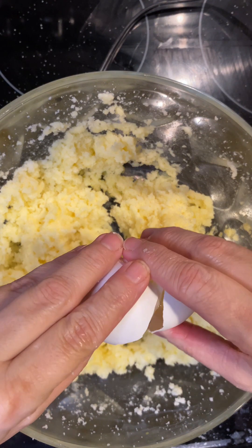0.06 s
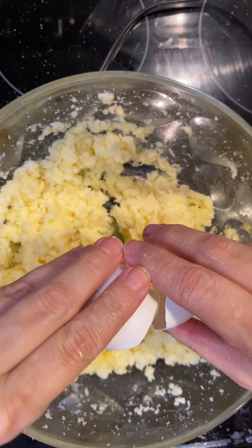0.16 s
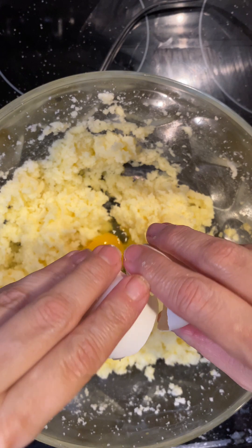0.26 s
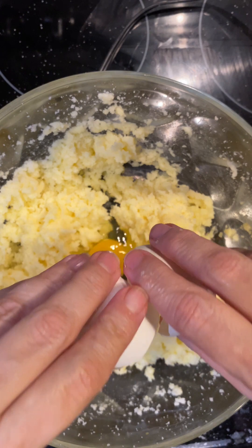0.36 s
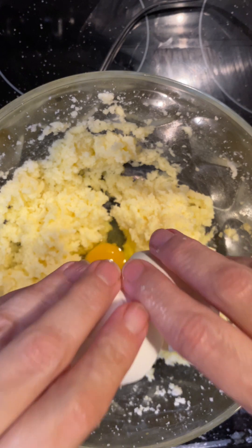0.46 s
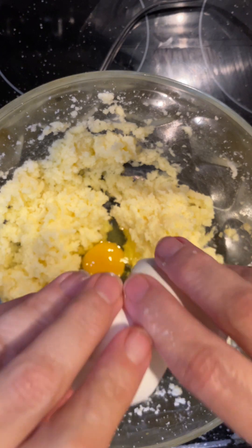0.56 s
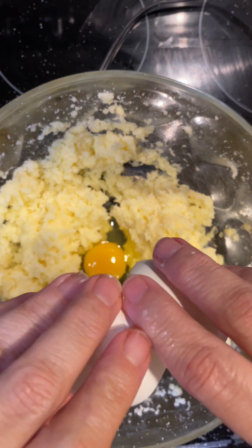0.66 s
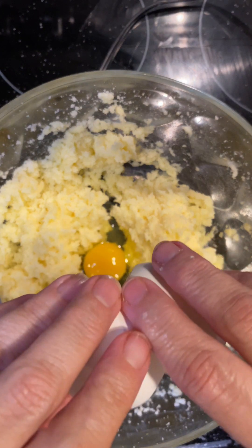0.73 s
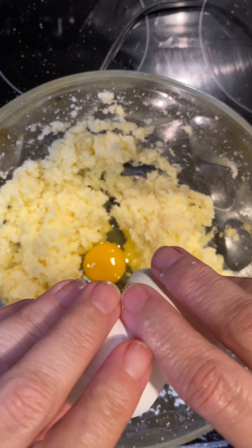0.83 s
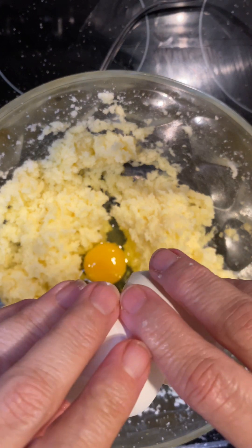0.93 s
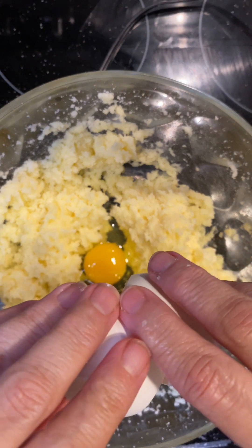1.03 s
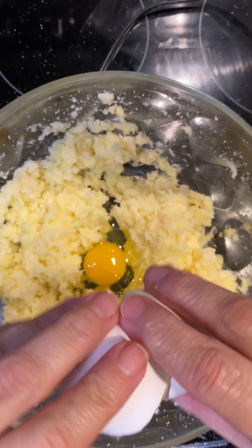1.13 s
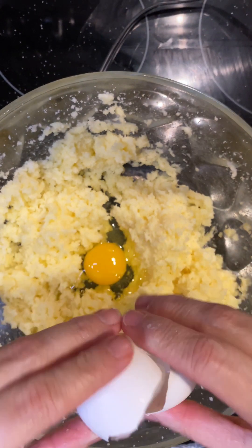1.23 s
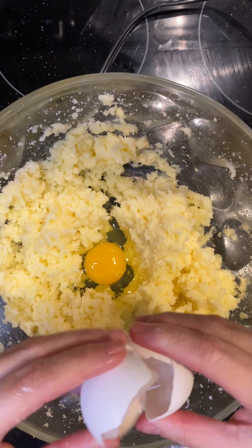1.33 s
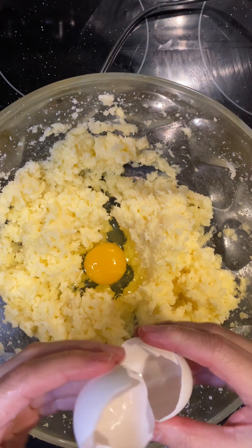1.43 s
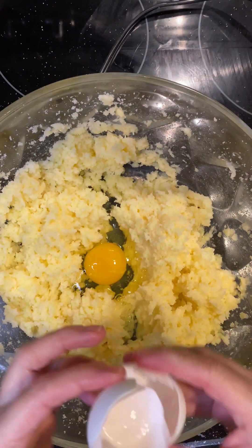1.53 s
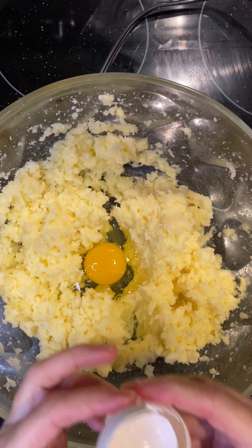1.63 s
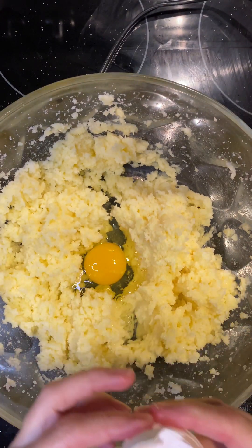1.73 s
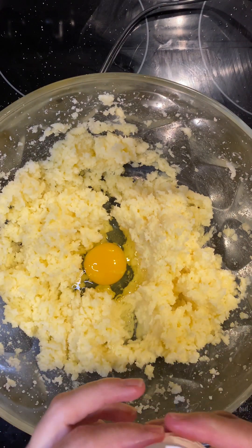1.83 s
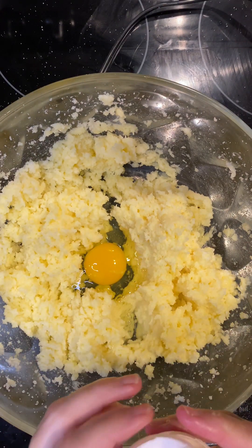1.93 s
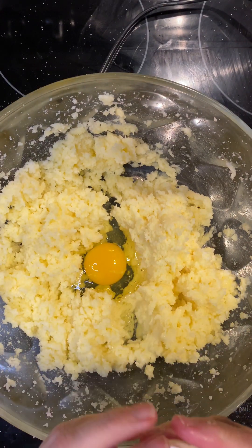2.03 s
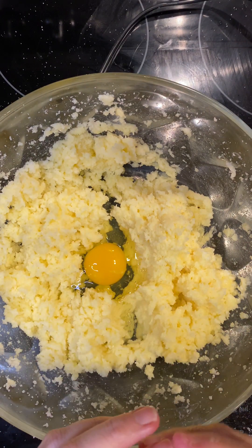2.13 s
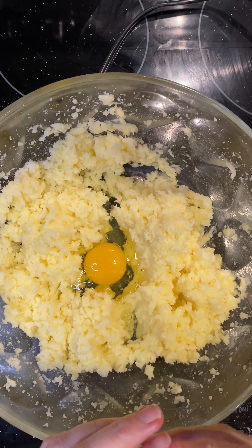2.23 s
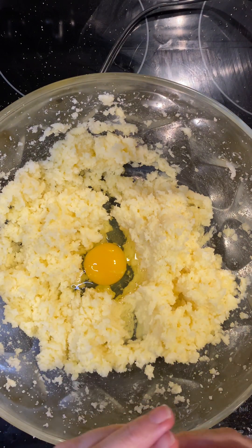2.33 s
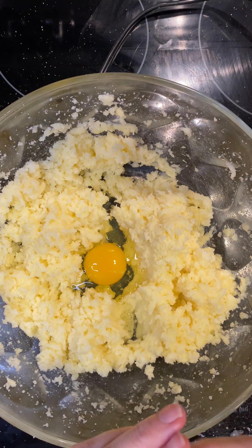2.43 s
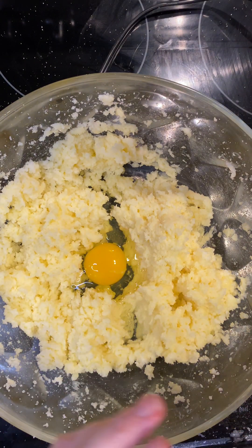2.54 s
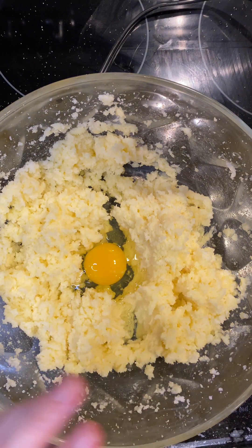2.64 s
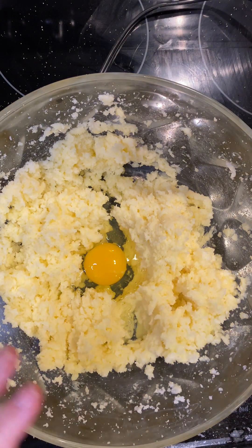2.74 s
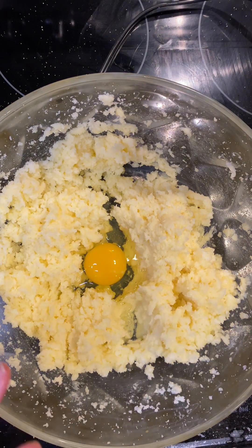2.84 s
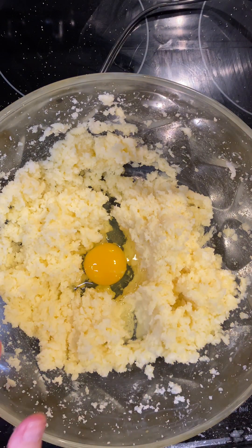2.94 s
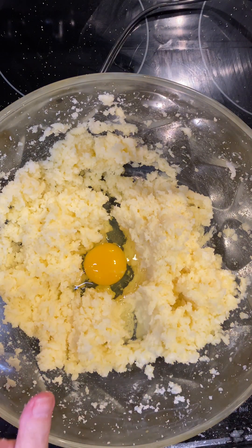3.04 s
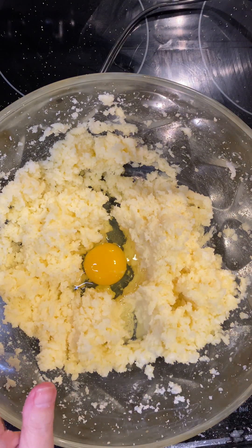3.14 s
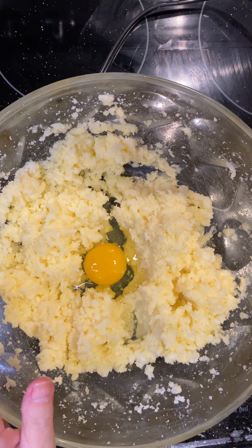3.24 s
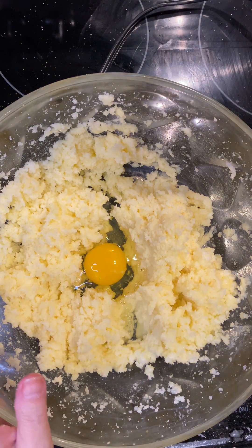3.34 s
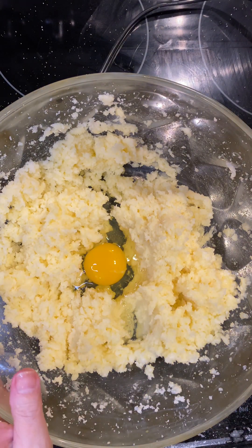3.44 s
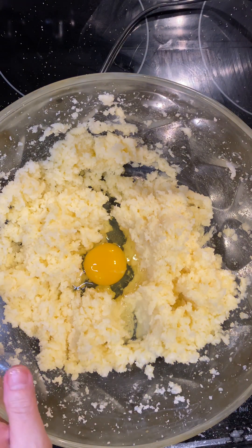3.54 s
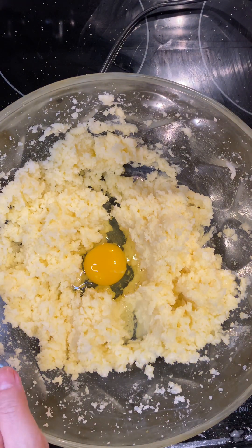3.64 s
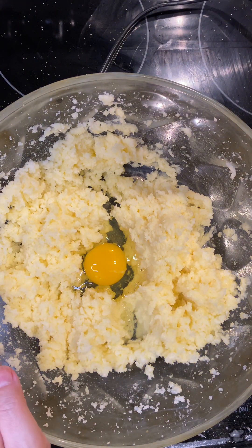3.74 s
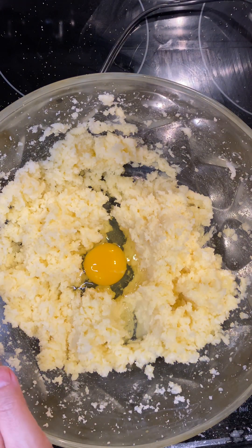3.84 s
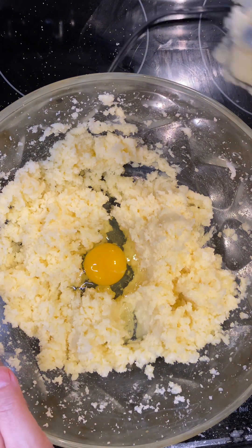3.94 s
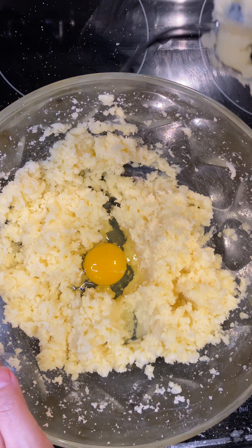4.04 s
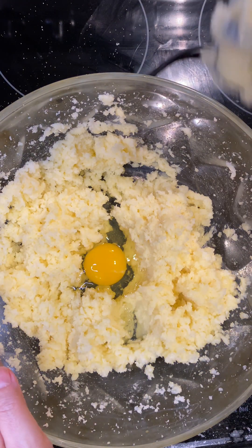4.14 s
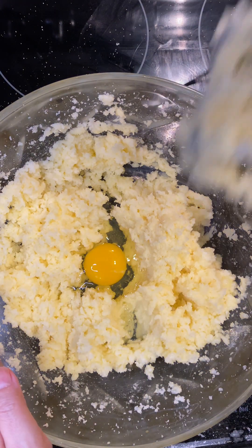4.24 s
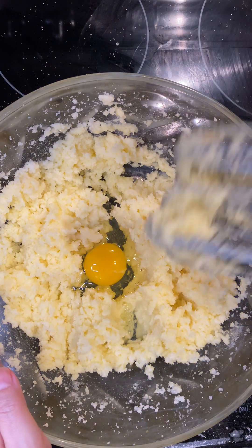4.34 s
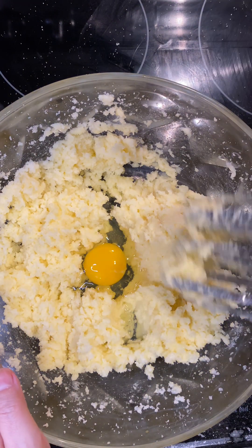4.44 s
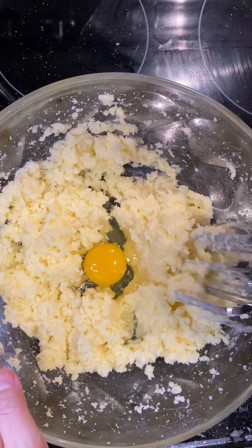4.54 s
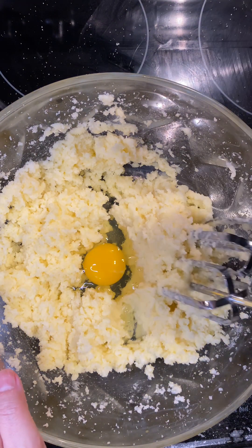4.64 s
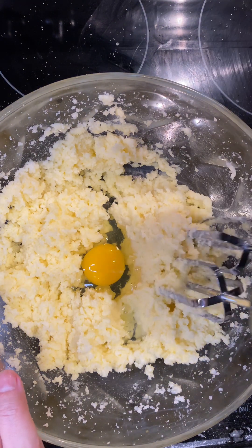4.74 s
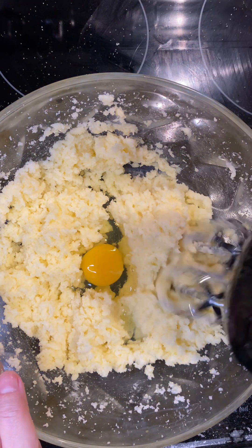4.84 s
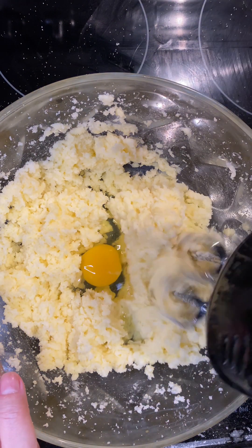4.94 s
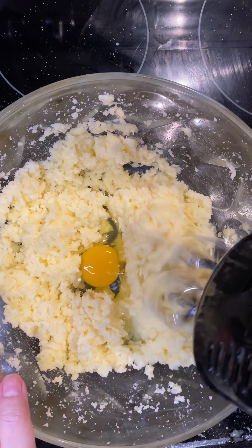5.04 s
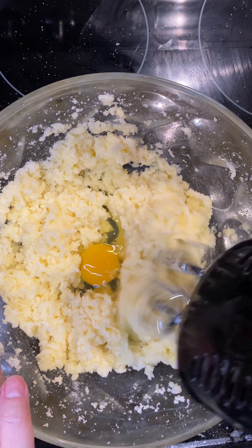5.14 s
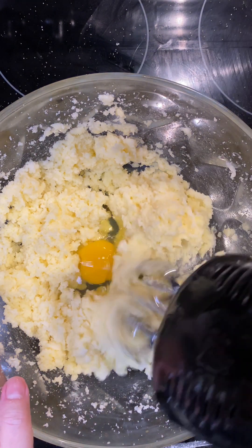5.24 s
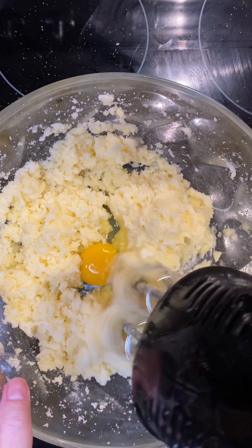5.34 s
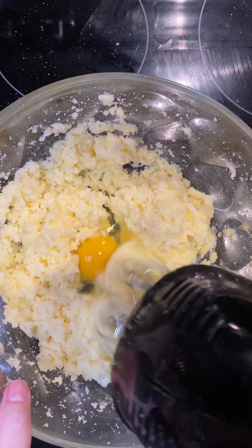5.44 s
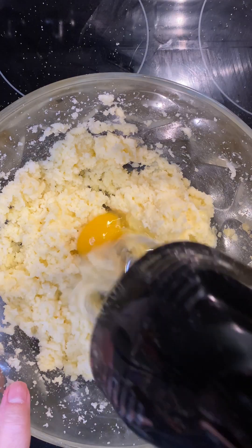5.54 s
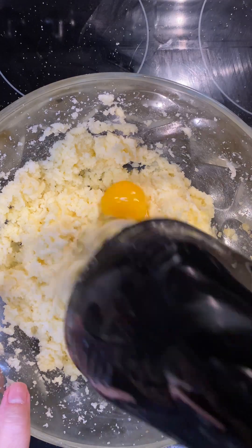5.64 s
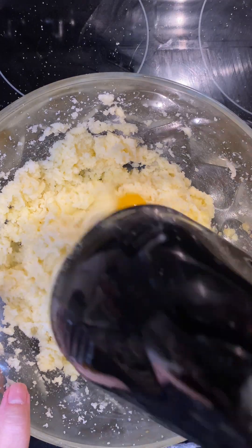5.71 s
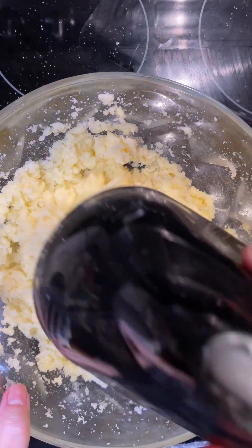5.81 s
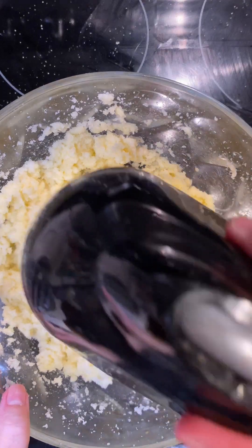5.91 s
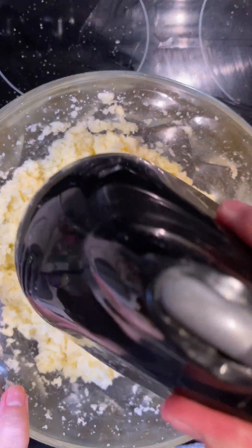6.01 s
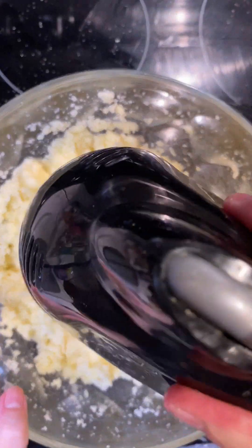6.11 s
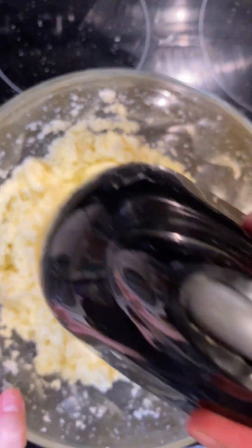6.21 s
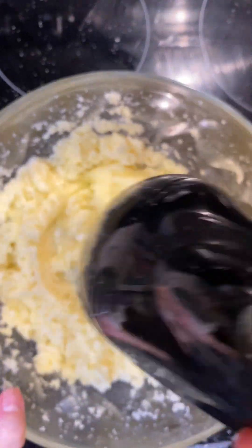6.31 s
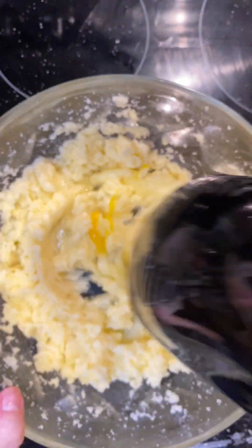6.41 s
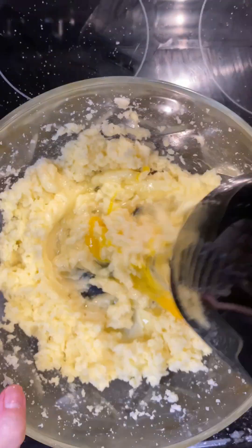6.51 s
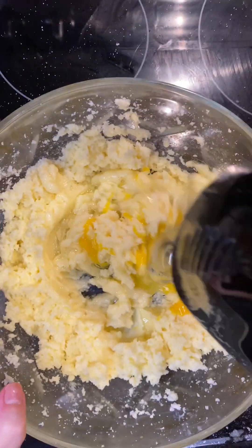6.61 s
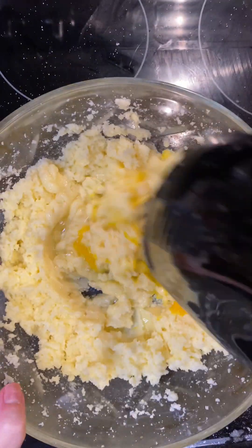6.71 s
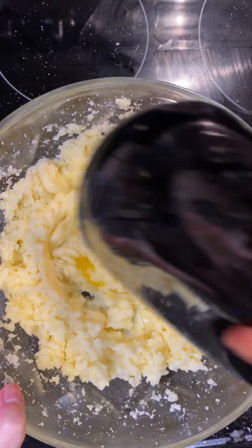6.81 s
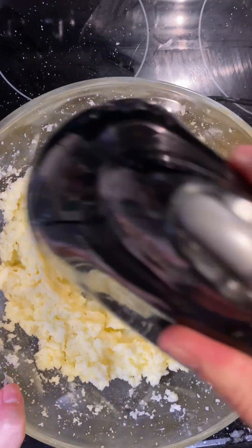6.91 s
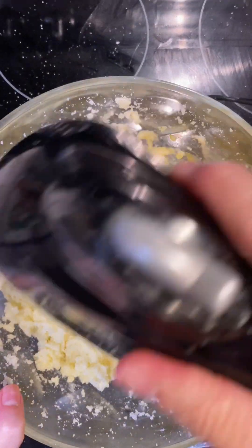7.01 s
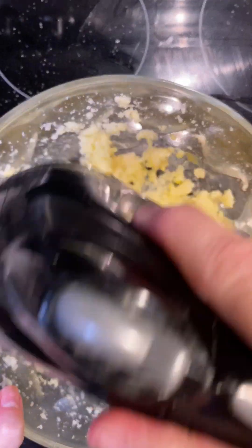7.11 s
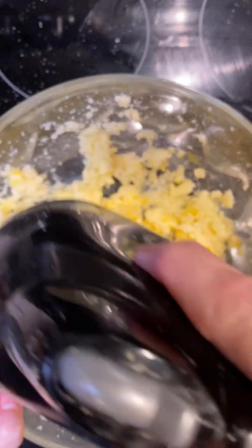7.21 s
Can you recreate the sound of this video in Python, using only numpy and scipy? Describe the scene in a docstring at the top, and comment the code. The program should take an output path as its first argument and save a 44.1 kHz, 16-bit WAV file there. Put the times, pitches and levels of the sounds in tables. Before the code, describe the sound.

Close stereo microphone, nearly dry room. Thin brittle shell clicks come in irregular clusters for over two seconds, with a brief soft plop early on. Near silence follows over faint refrigerator hum, then a bowl knock, handling clicks and a short low scrape. A hand mixer clicks on, pulses roughly while speeding up, and settles into a harsh whirring drone with rushing air, churning batter and dull bowl thumps.

```python
"""A kitchen, close up: fingers pull an eggshell apart, the egg plops into batter, the shell crackles away.
A hand mixer is picked up and switched on; its motor, fed one current pulse per mains cycle, runs up and
whirs; beaters bump the bowl. A fridge hums all along. Clicks and rubbing are shaped noise through rings,
the motor is shaft-locked tones plus gear, air and batter noise, the fridge is wavering sines over noise."""
import sys
import numpy as np
from scipy import signal
from scipy.fft import rfft, irfft, next_fast_len
from scipy.io import wavfile
from scipy.ndimage import uniform_filter1d, map_coordinates

SR = 44100
rng = np.random.default_rng(int(sys.argv[2]) if len(sys.argv) > 2 else 0)


def put_to_file(sound):
    """Save the sound as 16-bit audio at rate SR, in the file named by the first command-line argument."""
    columns = np.atleast_2d(sound).T  # one column per channel
    safe = np.clip(columns, -1, 1)
    whole_steps = np.round(safe * 32767)
    wavfile.write(sys.argv[1], SR, whole_steps.astype(np.int16))


N = 320607
T_S = np.arange(N) / SR


def amp(db):
    """Gain of a level in dB."""
    return 10 ** (np.asarray(db) / 20)


def unit(x):
    """Scaled to rms 1."""
    return x / np.sqrt(np.mean(x ** 2) + 1e-20)


def along(points, hz):
    """Value at hz, interpolated between (hz, value) points on a log axis."""
    f, v = np.transpose(points)
    return np.interp(np.log(hz + 1), np.log(f + 1), v)


def curves(rows):
    """One value per sample for each column after the time."""
    s, *cols = np.transpose(rows)
    return [np.interp(T_S, s, c) for c in cols]


def wobble(knots_per_s):
    """Smooth random curve."""
    knots = rng.standard_normal(int(N * knots_per_s / SR) + 4)
    return map_coordinates(knots, [np.arange(N) * knots_per_s / SR])


def filtered(x, response):
    """x times a complex response of frequency."""
    m = next_fast_len(x.shape[-1] + 8192)
    return irfft(rfft(x, m) * response(np.fft.rfftfreq(m, 1 / SR)), m)[..., :x.shape[-1]]


def mode(f, hz, width_hz):
    """Causal resonance of peak gain 1."""
    return 1j * f * width_hz / (hz * hz - f * f + 1j * f * width_hz)


def modes_sum(f, modes):
    """Complex sum of resonances."""
    return sum(amp(db) * mode(f, hz, width_hz) for hz, width_hz, db in modes)


def modes_power(f, modes, widen=1):
    """Sum of squared resonance magnitudes, no phase."""
    return sum(amp(db) * np.abs(mode(f, hz, widen * width_hz)) ** 2 for hz, width_hz, db in modes)


def noise(gain):
    """Two unrelated noises of one colour, rms 1."""
    return unit(filtered(rng.standard_normal((2, N)), gain))


def coloured(points):
    """Noise pair following (hz, db) points."""
    return noise(lambda f: amp(along(points, f)))


def thuds(rows):
    """Decaying low sines with a soft start; rows: start_s, level_db, pitch_hz, t60_s."""
    out, t = np.zeros(N + 8192), np.arange(8192) / SR
    for s, db, hz, t60 in rows:
        soft_start = 1 - np.exp(-t * hz / 0.22)
        out[round(s * SR):][:len(t)] += amp(db - 60 * t / t60) * np.sin(2 * np.pi * hz * t) * soft_start
    return out[:N]


SNAP = 4.5  # height of the crest sample over the click's noise


def clicks(rows, width_hz, broad_db):
    """Each click is a snap in a brief swell of noise: one ring, a broad snap and a treble part."""
    out, t = np.zeros((2, N + 8192)), np.arange(-1024, 3072) / SR
    crest = lambda x: x / np.sqrt(uniform_filter1d(2 * x[0] ** 2, size=66).max())
    for s, db, hz, treble_db, ms in rows:
        life_s = np.clip(ms - .9, .4, 40) / 1000
        swell_db = np.where(t < 0, 34 * t, -12 * t) / life_s
        burst = rng.standard_normal((2, len(t))) * amp(swell_db)
        burst[0, t == 0] = SNAP
        middle = filtered(burst, lambda f: mode(f, hz, width_hz) + amp(broad_db) * mode(f, 3000, 3900) ** 2)
        treble = filtered(burst, lambda f: mode(f, 6950, 12000) ** 2)
        click = crest(middle) + amp(treble_db) * crest(treble)
        out[:, round(s * SR):][:, :len(t)] += amp(db) * click
    return out[:, 1024:N + 1024]


# motor run-up and load: time_s, shaft_turns_per_s, level_db
MOTOR = [(4.712, 36, -38), (4.757, 47, -31), (4.803, 90, -36), (4.85, 104, -38), (4.88, 124, -35),
         (4.95, 142, -33.5), (5.02, 164, -32), (5.12, 170, -30.5), (5.22, 174, -29), (5.48, 199, -26),
         (5.8, 214, -26), (6.1, 219.5, -28.5), (6.28, 216.5, -29.5), (6.5, 196, -31), (6.7, 200, -31),
         (6.95, 197, -30.5), (7.05, 190, -31), (7.27, 184, -31.5)]
FREE_TURNS_PER_S = 229  # current would vanish here
MAINS_HZ, FIRST_PULSE_S, PULSE_RISE_S = 60, 4.7178, .0026  # rise: pulse start to crest
JOLT_S, JOLT_WIDTH_S = 4.757, 0.015  # gears and beaters take up their slack
THROB_GROWS, THROB_LEAST = 3.3, .08  # exponent on current; share left at full speed
TURN_S, TURN_LENGTH_S = 6.06, 0.77  # another side of the mixer turns to the listener
# colour change once turned: freq_hz, gain_db
TURNED_COLOUR = [(1700, -0.5), (2050, 0), (2280, 5.5), (2700, -2), (3250, -2), (3800, 2.5), (4300, 1),
                 (4900, 2), (5700, 0.5)]


def mixer():
    """Shaft, gears, air and batter driven by speed; torque comes in one pulse per mains cycle."""
    speed, level_db = curves(MOTOR)
    current = np.clip(1 - (speed / FREE_TURNS_PER_S) ** 2, .01, 1)  # falls as speed rises
    turns_rad = 2 * np.pi * np.cumsum(speed) / SR
    since_s = (T_S - FIRST_PULSE_S) % (1 / MAINS_HZ)
    pulse = unit(since_s * np.exp(-since_s / PULSE_RISE_S))
    share = np.maximum(current ** THROB_GROWS, THROB_LEAST)
    throb = lambda part: np.sqrt(1 - part + part * pulse ** 2)
    jolt = np.exp(-((T_S - JOLT_S) / JOLT_WIDTH_S) ** 2)
    out = gears(level_db, jolt) * throb(share)
    out += air(level_db, jolt) * throb(share ** 0.83)
    out += batter(current)
    tones = imbalance(speed, turns_rad) + shaft_orders(speed, level_db, turns_rad)
    tones += buzz(current, pulse) + blades(level_db, turns_rad) + slots(current, pulse, turns_rad)
    out[0] += np.sqrt(2) * tones + bumps()
    turned = np.clip((T_S - TURN_S) / TURN_LENGTH_S + .5, 0, 1)
    other_side = filtered(out, lambda f: amp(along(TURNED_COLOUR, f)))
    out = (1 - turned) * out + turned * other_side
    return out * np.clip((T_S - MOTOR[0][0]) / 0.0016, 0, 1)


# plastic case modes: freq_hz, width_hz, level_db
CASE_MODES = [(484, 210, -2.5), (917, 109, 0.5), (1160, 210, -10.5), (1611, 120, -2), (1890, 290, -8),
              (2060, 79, -2), (2300, 190, -10), (2600, 87, -10.5), (2820, 120, -5), (3240, 87, -9.5),
              (3395, 140, -5), (3767, 140, -4), (4885, 76, -5), (5760, 120, -6.5)]


def case(f):
    """Gain of the plastic case: resonances over a flat leak."""
    return amp(-12.0) + modes_power(f, CASE_MODES)


# gear noise colour: freq_hz, gain_db
GEAR_COLOUR = [(150, -36), (300, 0), (760, -2), (1300, 4), (2300, -1.5), (3100, -2.5), (9000, -45)]
JOLT_DB = -30


def gears(level_db, jolt):
    """Worm gears mesh unevenly: rattling noise through the case."""
    rattle = amp(0.33 * wobble(25) + 0.87 * wobble(300))
    mesh = filtered(rng.standard_normal((2, N)), lambda f: case(f) * amp(along(GEAR_COLOUR, f)))
    return (amp(level_db) + amp(JOLT_DB) * jolt) * unit(rattle * mesh)


# fan air colour: freq_hz, gain_db
AIR_COLOUR = [(1500, -12), (3000, -9.5), (4400, -4.5), (7000, -6.5), (11500, -10), (15500, -16.5)]
AIR_DB, JOLT_AIR_DB = -7.5, -30.5  # first is relative to motor level


def air(level_db, jolt):
    """Fan air: hiss partly coloured by the case."""
    gain = amp(level_db + AIR_DB + 0.45 * wobble(23)) + amp(JOLT_AIR_DB) * jolt
    return gain * noise(lambda f: amp(along(AIR_COLOUR, f)) * case(f) ** 0.58)


# batter rumble colour: freq_hz, gain_db
BATTER_COLOUR = [(35, -53), (50, -14), (64, 2), (110, -0.5), (250, 0.5), (500, -70)]
BATTER_DB, BATTER_GROWS = -48.5, 0.42  # level at current 0.14; exponent on current
BATTER_IN_S = 0.4  # beaters sink in


def batter(current):
    """Batter churned by the beaters: low noise growing with the current."""
    sunk = np.clip((T_S - MOTOR[0][0]) / BATTER_IN_S, .1, 1)
    load = (current / 0.14) ** BATTER_GROWS
    return sunk * load * amp(BATTER_DB + 2.5 * wobble(17)) * coloured(BATTER_COLOUR)


ROCK_HZ, ROCK_WIDTH_HZ, ROCK_DB, ROCK_BASE_DB = 212.5, 24, -38, -9.5
ROCK_DAMPED_S, ROCK_DAMPED_DB = 7.04, -6  # beaters dig in and steady the case


def imbalance(speed, turns_rad):
    """Once-a-turn tone, peaking where the hand-held case rocks."""
    rocking = amp(ROCK_BASE_DB) * (speed / ROCK_HZ) ** 2 + np.abs(mode(speed, ROCK_HZ, ROCK_WIDTH_HZ)) ** 2
    shaft_db = ROCK_DB + ROCK_DAMPED_DB * np.clip((T_S - ROCK_DAMPED_S) / 0.068, 0, 1)
    return rocking * amp(shaft_db + 0.72 * wobble(30)) * np.sin(turns_rad + 0.32 * wobble(30))


# faint shaft-locked tones: cycles_per_turn, level_db (over motor level, at ROCK_HZ turns/s)
ORDERS = [(2, -17), (3, -21), (12, -17)]


def shaft_orders(speed, level_db, turns_rad):
    """Shaft harmonics growing with the cube of speed."""
    tones = sum(amp(level_db + db + 2 * wobble(12)) * np.sin(k * (turns_rad + .08 * wobble(24)))
                for k, db in ORDERS)
    return (speed / ROCK_HZ) ** 3 * tones


BUZZ_DB, BUZZ_GROWS = -50, 2  # rms at full current; exponent on current


def buzz(current, pulse):
    """Windings buzz at the fourth mains harmonic of the current pulses."""
    harmonic = unit(filtered(pulse, lambda f: mode(f, 4 * MAINS_HZ, 30) ** 2))
    return current ** BUZZ_GROWS * amp(BUZZ_DB) * harmonic


BLADE_DB, BLADE_GROWS = -35.5, 2.06  # at the loudest; dB per dB of motor level


def blades(level_db, turns_rad):
    """Tone of ten fan blades, fading faster than the motor level."""
    blade_db = BLADE_DB + BLADE_GROWS * (level_db - level_db.max())
    return amp(blade_db + 2.5 * wobble(30)) * np.sin(10 * turns_rad + .7 * wobble(60))


SLOTS, SLOT_DB, SLOT_GROWS, SLOT_RISE_S = 12, -24, 2.2, .03  # dB at full current, before the case


def slots(current, pulse, turns_rad):
    """Magnetic pull on rotor slots follows the current and swells where it meets a case mode."""
    build = 1 - np.exp(-np.maximum(T_S - FIRST_PULSE_S, 0) / SLOT_RISE_S)
    pull = current ** SLOT_GROWS * amp(SLOT_DB + 1.8 * wobble(50)) * build * pulse
    tone = pull * np.sin(SLOTS * turns_rad + 1.4 * wobble(110))
    return filtered(tone, lambda f: case(f) ** 1.2)


# beaters on the bowl: start_s, level_db, thump_hz
BUMPS = [(6.51, -28, 76), (7.086, -29.5, 117), (7.185, -30.5, 98)]
BUMP_T60_S, BUMP_RING_HZ, BUMP_RING_DB = 0.15, 205, 0  # ring dB relative to thump


def bumps():
    """Beaters bump the bowl: a thump and a low ring each."""
    thumps = [(s, db, hz, BUMP_T60_S) for s, db, hz in BUMPS]
    rings = [(s, db + BUMP_RING_DB, BUMP_RING_HZ, BUMP_T60_S) for s, db, hz in BUMPS]
    return thuds(thumps + rings)


SHELL_GONE_S, LIFT_S = 2.5, 3.7  # shell put away; hand leaves the bowl for the mixer


def hands():
    """Shell cracks, egg, handling knocks, rubbing and a low scrape."""
    out = cracks() + knocks() + rubbing() + scrape()
    out[0] += plop()
    return out


# shell cracks: crest_s, level_db, ring_hz, treble_db, length_ms (level before the shell's rings)
CRACKS = [(0.0175, -59.5, 2900, 5, 5), (0.0328, -42.5, 1270, -25, 5), (0.024, -53, 1230, -25, 30),
          (0.068, -43.5, 1500, -5, 3), (0.0742, -41.5, 2360, 1, 4), (0.11, -54, 1350, -9.5, 5.4),
          (0.1441, -52, 1500, -2.5, 2.8), (0.1625, -42.5, 3570, 4, 3), (0.1677, -38.5, 4300, -6.5, 4.6),
          (0.173, -45, 850, -12, 5.6), (0.1975, -47.5, 3050, 15.5, 3.7), (0.2095, -56, 5080, -3, 2.6),
          (0.2407, -47, 1530, 2.5, 5.8), (0.2599, -39.5, 3500, 6, 4), (0.39, -60, 5070, 16, 4.1),
          (0.4039, -53, 2940, 4.5, 1.9), (0.417, -51, 2400, 15.5, 2.9), (0.431, -50, 3430, 5.5, 8.4),
          (0.4582, -30.5, 2540, 1, 2.6), (0.4871, -61.5, 3490, 20, 4.8), (0.504, -63.5, 2200, 11, 3),
          (0.5482, -54, 2130, 15, 5.8), (0.5673, -49, 2280, -5, 2.7), (0.6637, -49, 2350, -5, 3.7),
          (0.7225, -57.5, 2010, -8, 4), (0.7348, -61.5, 2180, 5.5, 8.4), (0.7656, -59.5, 3470, 11, 2.4),
          (1.1133, -40.5, 2370, 8.5, 2.8), (1.1387, -52, 2140, 0, 4.3), (1.1734, -39.5, 2350, 12.5, 5.4),
          (1.2207, -42.5, 1900, -23.5, 5.4), (1.2273, -48, 2270, -17, 2.6), (1.3222, -40, 2600, -6, 6.7),
          (1.328, -24.5, 2620, -27, 6), (1.52, -66, 5000, 7.5, 2), (1.5505, -43, 2800, 3.5, 4.9),
          (1.577, -34.5, 5730, -10.5, 6), (1.597, -46, 2600, 4, 6), (1.6037, -49, 2600, 8, 2.1),
          (1.6262, -58.5, 2570, -1, 2.5), (1.6394, -48, 2910, 2, 6.9), (1.6557, -56, 2530, -5, 3.6),
          (1.7518, -53, 2200, 6, 6.1), (1.7654, -50, 2260, 1, 20), (1.8383, -60.5, 5630, 20, 2.9),
          (1.8485, -54, 5540, 14.5, 2.2), (1.9103, -56, 1940, -18, 4.6), (1.9376, -47.5, 2200, 2, 5),
          (2.075, -53.5, 1950, 6, 9.3), (2.089, -48.5, 5250, 10.5, 5.6), (2.1438, -43.5, 5200, 6, 3),
          (2.15, -42.5, 1880, -10.5, 12), (2.224, -56.5, 2820, 16, 4.3), (2.328, -60, 1690, -14, 6.6),
          (2.36, -59.5, 1570, -8, 9.9)]
# hollow rings of the shell: freq_hz, width_hz, level_db
SHELL_MODES = [(2150, 100, -7), (2800, 130, -12), (5150, 200, -13)]


def cracks():
    """Shell fractures: clicks ringing the hollow shell."""
    snaps = clicks(CRACKS, width_hz=320, broad_db=-13)
    return filtered(snaps, lambda f: 1 + 4 * modes_sum(f, SHELL_MODES))


# egg landing: start_s, level_db, pitch_hz, t60_s
PLOP = [(.2624, -27, 890, .02)]


def plop():
    """Egg lands in batter: one short low ring."""
    return thuds(PLOP)


# bowl and mixer handled, switch last: crest_s, level_db, ring_hz, treble_db, length_ms
KNOCKS = [(3.1213, -34.5, 1720, 6, 10), (3.2494, -59, 1730, -30, 48), (3.4203, -60, 1720, -30, 9),
          (3.5178, -51, 1810, -32, 14), (3.8724, -47, 1410, 11, 16), (3.912, -39, 2600, 2, 24),
          (3.9594, -34.5, 1420, -3, 10), (4.068, -51, 690, -30, 40), (4.1641, -57, 1170, -29, 11),
          (4.3211, -52.5, 1730, -28, 9.7), (4.3712, -44, 1450, -36, 6.7), (4.549, -42.5, 1010, -29, 12),
          (4.603, -43.5, 1180, -23, 9), (4.6223, -54, 1500, -16, 7.5), (4.6365, -67, 3300, 10, 2),
          (4.722, -25.5, 1020, -3, 13)]
# bowl rings: freq_hz, width_hz, level_db
BOWL_MODES = [(1750, 200, -5), (4730, 50, 5), (5005, 50, 4)]


def knocks():
    """Knocks ring the bowl until the hand leaves it, then stay dry."""
    hits = clicks(KNOCKS, width_hz=340, broad_db=-22)
    lifted = T_S >= LIFT_S
    ringing = filtered(hits * ~lifted, lambda f: 0.5 + modes_sum(f, BOWL_MODES))
    return ringing + hits * lifted


# finger strokes: crest_s, level_db, hold_s
RUBS = [(0.0, -65.5, 0.35), (.45, -65.5, 0.125), (.76, -69.5, 0.024), (1.13, -57, 0.023), (1.34, -69, 0.11),
        (1.58, -60.5, 0.076), (1.76, -56.5, 0.057), (1.94, -65.5, 0.013), (2.04, -61.5, 0.085),
        (2.13, -54, 0.0066), (2.33, -73.5, 0.086), (2.63, -76, 0.041), (3.12, -64.5, 0.052),
        (3.3, -79, 0.16), (3.53, -75.5, 0.08), (3.7, -78.5, 0.15), (3.915, -51.5, 0.048), (4.08, -74, 0.24),
        (4.3, -71.5, 0.16), (4.55, -63.5, 0.24)]
RUB_RISE_DB_PER_S, RUB_FALL_DB_PER_S = 393.5, 141


def strokes(rows):
    """Each stroke swells, holds and dies away by one rule; gains add in power."""
    def shape_db(s, hold_s):
        rise = RUB_RISE_DB_PER_S * np.minimum(T_S - s, 0)
        return rise - RUB_FALL_DB_PER_S * np.maximum(T_S - s - hold_s, 0)
    return np.sqrt(sum(amp(db + shape_db(s, hold_s)) ** 2 for s, db, hold_s in rows))


# skin rub colour: freq_hz, gain_db
SKIN_COLOUR = [(400, -20.5), (1000, -8.5), (1500, 1), (2150, 4.5), (2800, 0), (3500, -9.5), (5200, -2.5),
               (6500, -4), (16000, -13.5)]
# hollow ring of the mixer handle: freq_hz, width_hz, level_db
GRIP_MODES = [(1064, 410, 8)]


def rubbing():
    """Skin grains rub and excite whatever is held: shell, bowl, then handle."""
    level = strokes(RUBS) * (T_S < MOTOR[0][0])
    with_shell, lifted = T_S < SHELL_GONE_S, T_S >= LIFT_S
    roughness = np.where(with_shell, 1, .4)  # wet shell crackles, bowl and handle rub smoothly
    grain = amp(roughness * (6 * wobble(70) + 3.5 * wobble(400)))
    out = level * amp(-1.5) * unit(grain * coloured(SKIN_COLOUR))
    with_bowl = ~with_shell & ~lifted
    for held, modes in ((with_shell, SHELL_MODES), (amp(-15.0) * with_bowl, BOWL_MODES),
                        (amp(-6.5) * lifted, GRIP_MODES)):
        ring = noise(lambda f: modes_power(f, modes, widen=2.9))
        out += held * level * amp(modes[0][2] - 6.5) * unit(grain * ring)
    return out


# mixer slides off the counter: time_s, level_db
DRAG = [(3.85, -74), (3.88, -61), (3.93, -51), (3.97, -64), (4.1, -70), (4.2, -73)]


def scrape():
    """Low sliding scrape: wavering noise around one resonance."""
    return amp(curves(DRAG)[0] + 1.2 * wobble(70)) * noise(lambda f: np.abs(mode(f, 514, 260)) ** 2)


# echo decay: freq_hz, t60_s
KITCHEN_DECAY = [(300, 0.12), (10000, 0.063)]


def kitchen(x):
    """Room echo as decaying noise; each frequency dies at its own speed."""
    hz, t, z = signal.stft(rng.standard_normal((2, SR // 2)), SR, nperseg=256)
    decay = amp(-60 * t / along(KITCHEN_DECAY, hz)[:, None])
    tail = signal.istft(z * decay, SR, nperseg=256)[1]
    late = np.pad(x, (200, 0))[None]  # 200 samples of delay
    return signal.fftconvolve(late, tail / np.linalg.norm(tail[0]), axes=1)[:, :N]


# compressor tones: pitch_hz, level_db (rms)
HUM = [(59.2, -65.5), (118.4, -61), (184, -63.5), (377.5, -66.5), (472.5, -74.5), (572, -79)]
# narrow hiss bands: freq_hz, width_hz, level_db
WHISTLES = [(3700, 400, 2), (4860, 250, 2), (5330, 200, 0)]
# room hush colour: freq_hz, gain_db
HUSH_COLOUR = [(25, -12), (90, 5), (230, 1), (600, -13.5), (1000, -22), (2400, -23), (2900, -31.5),
               (4400, -33), (6500, -40), (15000, -47)]
HUSH_DB, WHISTLE_DB = -66.5, -85.5


def fridge():
    """Slightly wavering compressor tones and narrow hiss over the room's hush."""
    out = amp(HUSH_DB) * coloured(HUSH_COLOUR)
    out += amp(WHISTLE_DB) * noise(lambda f: modes_power(f, WHISTLES))
    for hz, db in HUM:
        level = np.sqrt(2) * amp(db + 1.26 * wobble(9.9))
        out[0] += level * np.sin(2 * np.pi * hz * T_S + 0.55 * wobble(3.0))
    return out


def ports(pair, alike):
    """Left and right from a shared and an unshared part, mixed to a likeness per frequency."""
    turn = lambda hz: np.arccos(np.clip(along(alike, hz), -1, 1)) / 2
    mid, side = filtered(pair, lambda hz: np.array([np.cos(turn(hz)), np.sin(turn(hz))]))
    return np.array([mid + side, mid - side])


# left-right likeness of near sources: freq_hz, correlation
NEAR_ALIKE = [(100, .997), (640, .93), (1500, .985), (2700, .7), (4400, .75), (7200, .95), (15000, .86)]
# the same for the fridge and hush: freq_hz, correlation
FAR_ALIKE = [(100, 1), (300, 0.34), (950, 0.091), (15000, 0.12)]


def scene():
    """Hands with their echo and the mixer, over the fridge."""
    near = hands()
    near = near + amp(-13.5) * kitchen(near[0]) + mixer()
    return ports(near, NEAR_ALIKE) + ports(fridge(), FAR_ALIKE)


# left minus right colour: freq_hz, difference_db
TILT = [(90, 1), (380, -3.5), (950, -1), (2700, -2), (5000, -0.5), (15000, 1)]
# left ahead of right: freq_hz, phase_rad
LEAD = [(4900, 0), (7000, 3.05), (7700, 3.25), (10000, 6.15), (10900, 6.4), (13100, 9.3), (14400, 9.55),
        (15800, 12.3)]
TOP_HZ = 15750


def record(dry):
    """Two ports differ in colour and, in the treble, in phase; nothing is kept above the band limit."""
    side = np.array([[.5], [-.5]])
    f, lead_rad = np.transpose(LEAD)

    def response(hz):
        phase = np.exp(1j * side * np.interp(hz, f, lead_rad))
        return amp(side * along(TILT, hz)) * phase * (hz < TOP_HZ)
    return filtered(dry, response)


dry = scene()
out = record(dry)
put_to_file(out)
```